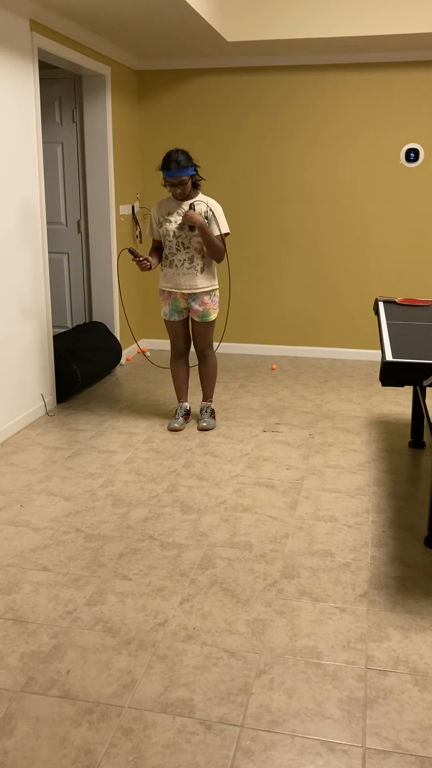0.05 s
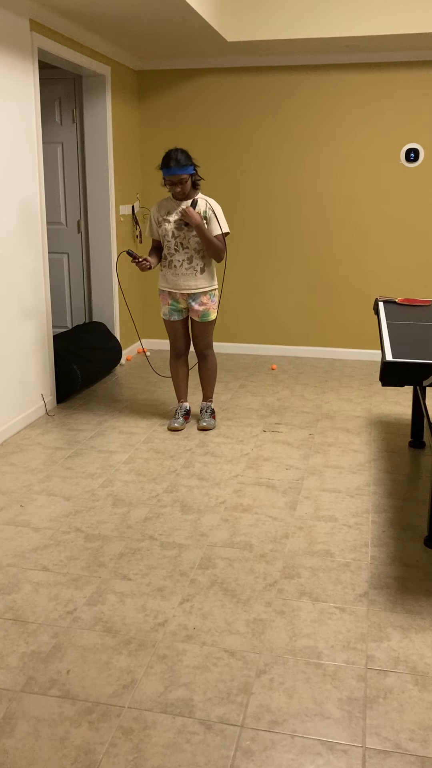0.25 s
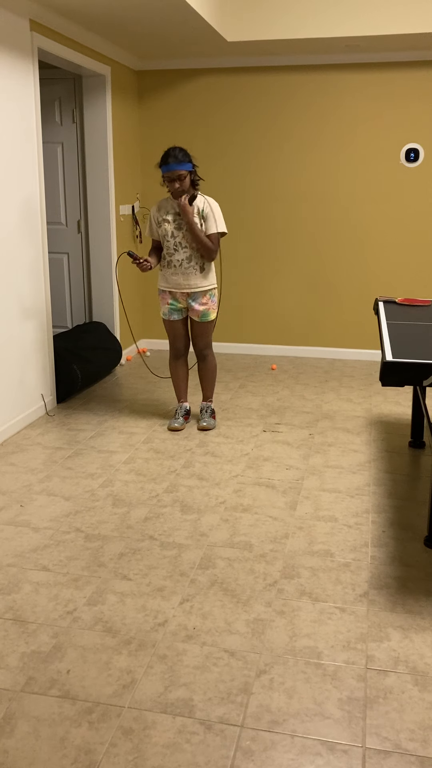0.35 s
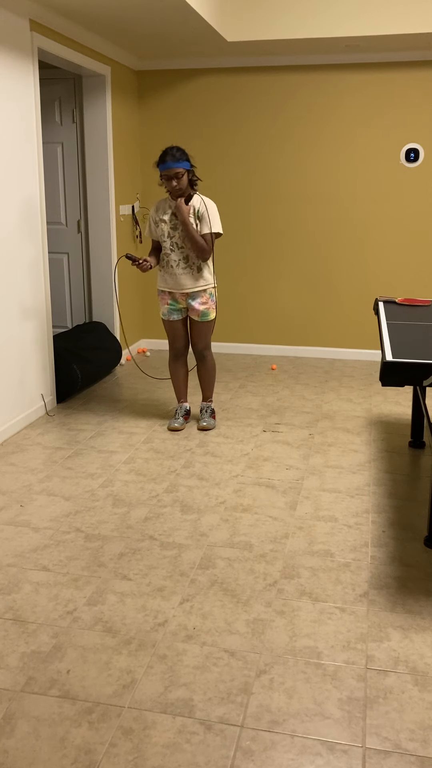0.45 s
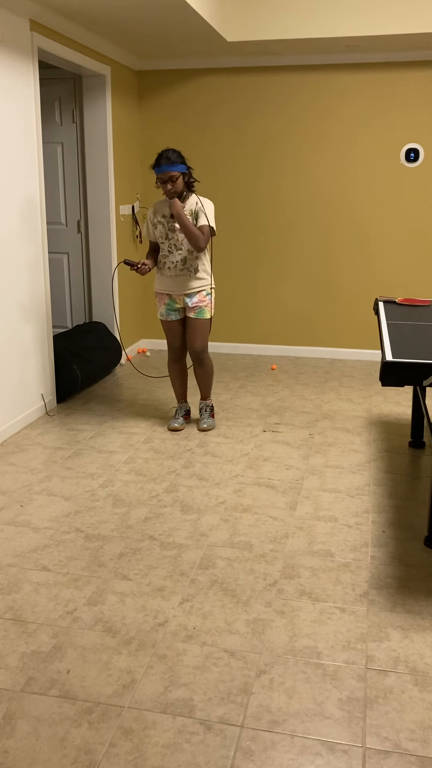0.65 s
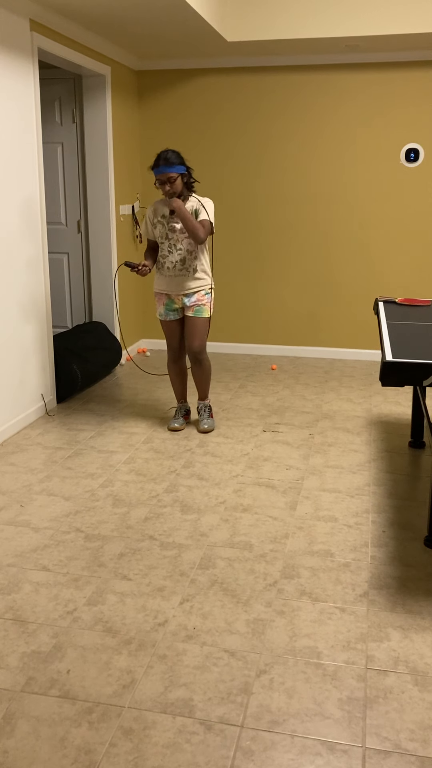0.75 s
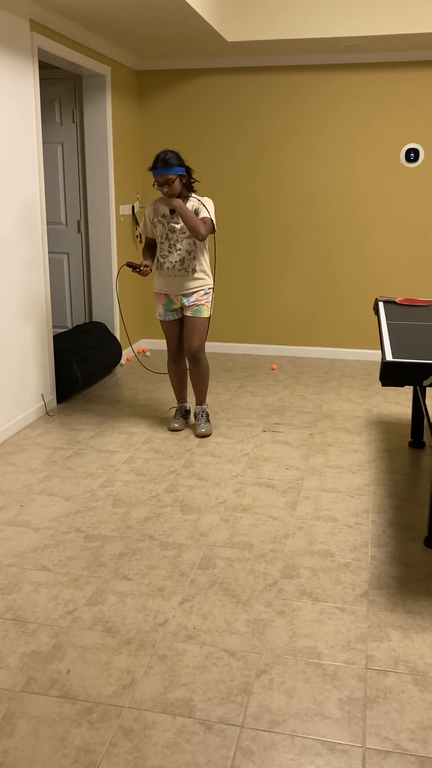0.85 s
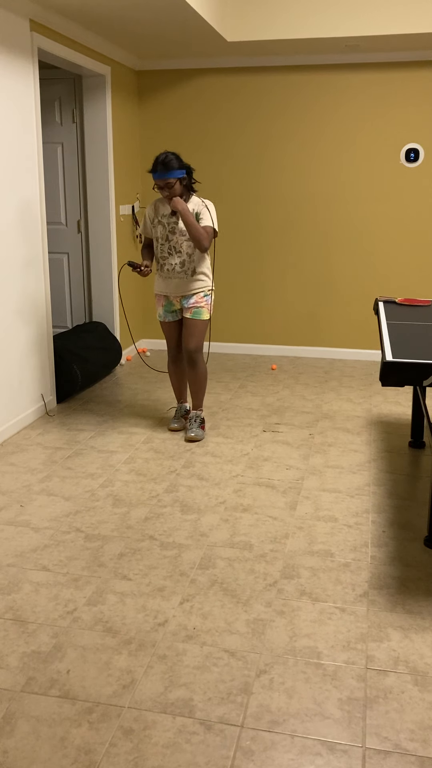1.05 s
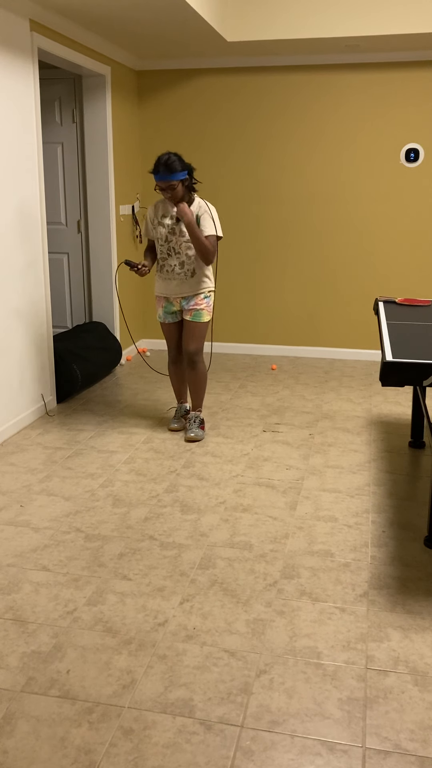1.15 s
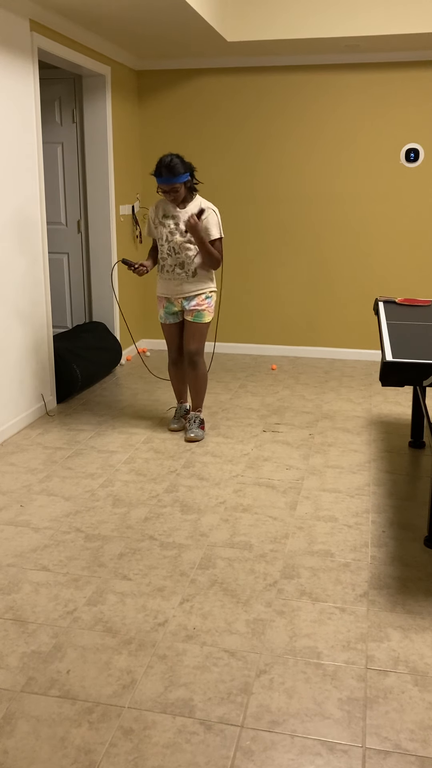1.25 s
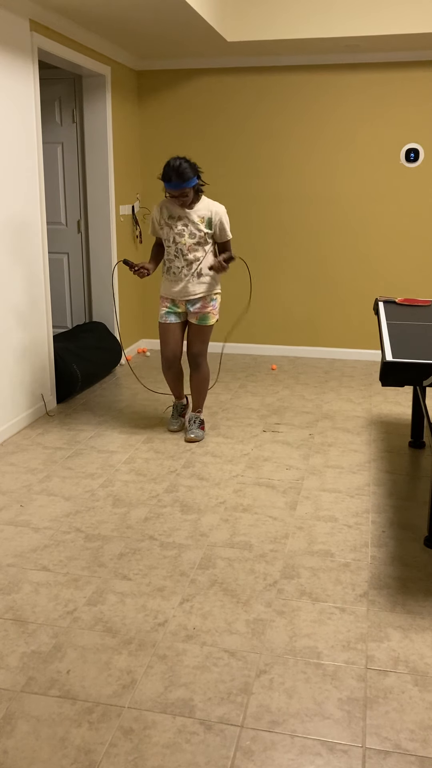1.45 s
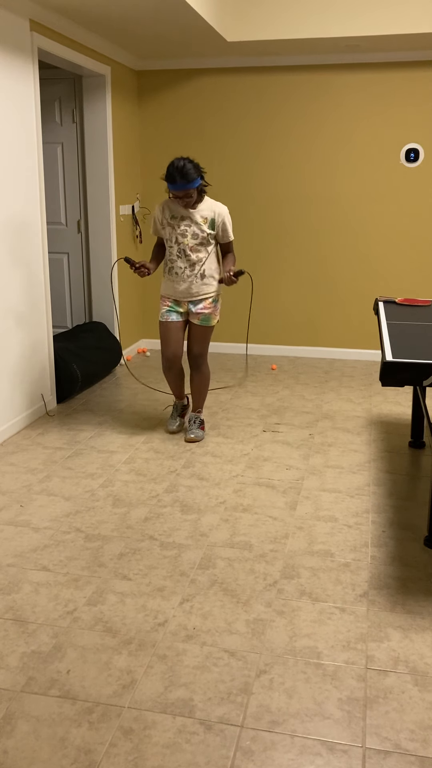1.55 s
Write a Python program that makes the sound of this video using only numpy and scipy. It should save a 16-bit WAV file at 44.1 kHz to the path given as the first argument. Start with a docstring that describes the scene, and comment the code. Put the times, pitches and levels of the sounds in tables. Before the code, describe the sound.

One sharp knock on a tiled floor cracks and rings in an echoing room. Someone then shifts weight with dull thuds, sets a shoe down and scuffs it, clothes rustling faintly. A microphone a few metres away catches quiet room noise.

```python
"""A knock in a bare room

One sharp knock on a tiled floor: a dry crack, hard echoes off the walls and a bright, ringing tail.
Someone shifts weight with dull thuds, sets a shoe down and scuffs it; clothes rustle faintly.
A small microphone a few metres away hears it all over quiet room noise, through two openings
(its ports) that ring in the treble."""
import sys
import numpy as np
from scipy import signal
from scipy.fft import rfft, irfft, next_fast_len
from scipy.io import wavfile

SR = 44100
rng = np.random.default_rng(int(sys.argv[2]) if len(sys.argv) > 2 else 0)


def store_wav(level_fs):
    """Save 16-bit WAV to argv[1]."""
    pcm = np.round(np.clip(np.atleast_2d(level_fs), -1, 1) * 32767)
    wavfile.write(sys.argv[1], SR, pcm.T.astype(np.int16))


N = 70560


def amp(db):
    """Turn decibels into a number to multiply by."""
    return 10 ** (np.asarray(db) / 20)


def along(points, hz):
    """Read a curve of (frequency, value) points at hz, with all octaves equally wide."""
    f, values = np.transpose(points)
    return np.interp(np.log(hz + 1), np.log(f + 1), values)


def since(start):
    """Seconds since start, zero before it."""
    return np.maximum(np.arange(N) / SR - start, 0)


def fade(t, t60):
    """Die away by 60 dB every t60 seconds (the fade time)."""
    return np.exp(-np.log(1000) * t / t60)


def stroke(start, hold, rise, t60):
    """A level that swells at start and begins to fade hold seconds later."""
    return (1 - np.exp(-since(start) / rise)) * fade(since(start + hold), t60)


def ring(start, hz, t60, rise):
    """One pure tone that starts softly and dies away."""
    return stroke(start, rise, rise, t60) * np.sin(2 * np.pi * hz * since(start))


def grain(depth, rate):
    """A level that flickers at random, rate times a second, keeping the average power."""
    gain = np.exp(depth * np.interp(since(0) * rate, np.arange(N), rng.standard_normal(N)))
    return gain / np.sqrt(np.mean(gain ** 2))


def filtered(x, response):
    """Scale and delay each frequency in x as response says."""
    size = 2 * next_fast_len(N)
    return irfft(rfft(x, size) * response(np.fft.rfftfreq(size, 1 / SR)), size)[..., :N]


def coloured(x, colour):
    """Give x a colour: a balance of low and high frequencies."""
    def response(hz):
        gain = amp(along(colour, hz))
        gain /= np.sqrt(np.mean(gain ** 2))
        # these steps keep the filter from sounding before its input does
        cepstrum = irfft(np.log(gain))
        cepstrum[1:len(hz) - 1] *= 2
        cepstrum[len(hz):] = 0
        return np.exp(rfft(cepstrum))
    return filtered(x, response)


def resonant(x, peaks):
    """Make x ring at each (frequency, width, boost) peak; a negative boost cuts a dip."""
    def response(f):
        return 1 + sum((amp(db) - 1) * 1j * f * width / (hz ** 2 - f ** 2 + 1j * f * width)
                       for hz, width, db in peaks)
    return filtered(x, response)


def rippled(x, depth_db=2.6, spacing_hz=22.48):
    """The room favours some frequencies and weakens others, at random."""
    return coloured(x, np.column_stack([spacing_hz * np.arange(N), depth_db * rng.standard_normal(N)]))


# how alike left and right sound: f/Hz, likeness (1 = the same)
LIKENESS = [(100, .99), (170, .98), (280, .85), (520, .45), (1500, .3), (3500, .25), (5400, .86),
            (7500, .9), (8600, .99), (10000, .82), (11600, .98), (13000, .85), (14500, .97)]

def diffuse():
    """Hiss reaching the two ports from all sides."""
    def shares(hz):
        angle = np.arccos(np.clip(along(LIKENESS, hz), -1, 1)) / 2
        return np.array([np.cos(angle), np.sin(angle)])
    shared, opposite = filtered(rng.standard_normal((2, N)), shares)
    return np.array([shared + opposite, shared - opposite])


# colour of the room noise: f/Hz, level/dB
NOISE_COLOUR = [(30, -10), (55, 5.5), (120, 2), (300, -15), (600, -31), (1200, 3), (2500, -8), (5500, -31),
                (9000, -1), (13000, -6), (15500, -26)]

def room_noise():
    """The room's quiet, steady rumble and hiss."""
    return amp(-62) * coloured(diffuse(), NOISE_COLOUR)


def squeak():
    """A faint squeak of the sole, already dying away when the scene opens."""
    return amp(-62) * ring(start=-1.9, hz=1083, t60=5.5, rise=0.025)


# slides of the sole: t/s, length/s, level/dB, fade time/s
SCUFFS = [(-.03, 0.025, -55, 0.92), (1.207, 0.14, -54, 1), (1.431, .07, -63, 0.53)]
# colours of the slides, the heel tap and the footfall: f/Hz, level/dB
SCUFF_COLOUR = [(100, -10), (180, -3.5), (330, 1.5), (700, -2), (1500, 0.5), (2800, -9), (4700, -12.5),
                (6500, -19), (9500, -14.5), (15500, -21)]
HEEL_COLOUR = [(60, 5), (200, 12.5), (600, 14.5), (1300, 13), (2000, -2), (3000, -16), (15000, -12)]
STEP_COLOUR = [(30, -25), (60, -7), (140, -8), (240, -5), (400, -10), (600, -2.5), (900, -15),
               (1700, -15.5), (2700, -28.5), (4700, -21.5), (7000, -29.5), (10000, -28.5), (15500, -46)]
# where the room rings under the shoe: f/Hz, width/Hz, boost/dB
SHOE_PEAKS = [(142, 15, 9.5), (190, 11, 3.5), (291.3, 9.4, 11), (458, 105, 1), (565, 7.3, -6)]

def shoe(lands_s=0.99):
    """A shoe scrapes the tiles, taps its heel and rolls flat; each sound lingers in the room."""
    heel = amp(-46) * stroke(lands_s, hold=0, rise=0.005, t60=0.19) * diffuse()
    roll = amp(-43) * stroke(lands_s, hold=0.058, rise=0.015, t60=0.87)
    step = roll * grain(depth=0.16, rate=330) * diffuse()
    slides = sum(amp(db) * stroke(start, length, rise=0.012, t60=t60)
                 for start, length, db, t60 in SCUFFS)
    grit = slides * grain(depth=0.15, rate=1200) * diffuse()
    sole = coloured(heel, HEEL_COLOUR) + coloured(step, STEP_COLOUR) + coloured(grit, SCUFF_COLOUR)
    return resonant(rippled(sole), SHOE_PEAKS)


# shifts of weight: t/s, level/dB, upper tones compared with the boom/dB
THUDS = [(0.017, -45.5, -7), (0.167, -56, -34), (0.429, -59, -26), (0.705, -53, -4.5), (0.784, -47, -1),
         (1.024, -46.5, 2), (1.488, -48.5, -7.5), (1.525, -43, -12.5)]
# the floor's upper tones: f/Hz, level/dB, fade time/s
FLOOR_TONES = [(97.7, -2, 0.61), (144.1, -2.5, 0.35), (176, -7, 0.2), (268, -22, 0.29)]
# colour of the sole pressing down: f/Hz, level/dB
PAD_COLOUR = [(60, -25), (150, 4.5), (260, 3), (380, -10), (600, -24.5), (1500, -46), (15000, -73)]

def thuds():
    """Each shift of weight makes the floor boom and ring, with a soft puff of noise from the sole."""
    floor, pads = np.zeros((2, N))
    for start, db, upper_db in THUDS:
        boom = ring(start, hz=55.7, t60=0.29, rise=0.013)
        upper = sum(amp(level) * ring(start, hz, t60, rise=0.0049) for hz, level, t60 in FLOOR_TONES)
        floor += amp(db) * (boom + amp(upper_db) * upper)
        pads += amp(db + upper_db - 11) * stroke(start, hold=0, rise=0.0032, t60=0.39)
    return floor + coloured(pads * diffuse(), PAD_COLOUR)


# colours of the grazing touch and of the knock itself: f/Hz, level/dB
TOUCH_COLOUR = [(200, -36), (1500, 1), (3000, -2), (6000, -4), (15000, -20)]
KNOCK_COLOUR = [(150, -34.5), (300, -26), (500, -19), (900, -15), (1600, -11), (2800, -3.5), (4000, -5),
                (6700, 0.5), (7600, -5.5), (10700, -0.5), (12600, -15), (15800, -2.5)]
# broad bands where the knock rings: f/Hz, width/Hz, boost/dB
KNOCK_PEAKS = [(1605, 180, 6), (2804, 220, 3.5), (4685, 186, 7), (5985, 69, 2.5), (6680, 170, 3.5),
               (8700, 310, 9), (10760, 250, 6), (12760, 160, 16.5), (14800, 230, -8)]
# bunches of wall echoes: delay/s, spread/s, level/dB
WALL_ECHOES = [(.006, 0.0027, -27.5), (0.022, 0.0068, -24.5), (0.035, 0.0051, -25.5),
               (0.051, 0.0046, -23.5), (.072, 0.004, -26), (.094, 0.0051, -27), (.137, .005, -35)]

def knock(hit_s=0.2248):
    """A grazing touch leads into the crack, which arrives directly, then off the walls, then blurs."""
    t = since(hit_s)
    direct = amp(-22.5) * np.exp(-t / 0.0055)
    echo_power = sum(amp(db) ** 2 * np.exp(-((t - delay) / spread) ** 2)
                     for delay, spread, db in WALL_ECHOES)
    cracks = (t > 0) * np.sqrt(direct ** 2 + echo_power) * diffuse()
    blow = coloured(cracks + echo_tail(hit_s), KNOCK_COLOUR)
    touch = amp(-37.5) * np.exp(-np.abs(since(0) - hit_s) / 0.004) * diffuse()
    return resonant(blow, KNOCK_PEAKS) + coloured(touch, TOUCH_COLOUR)


# how long the room holds a sound: f/Hz, fade time/s
ROOM_FADE = [(60, 0.32), (150, 0.21), (400, 1.19), (1300, 1.39), (2700, 0.99), (5400, 1.04), (8500, 0.75),
             (11000, 0.84), (15000, 0.39)]
# narrow tones that sing in the tail: f/Hz, boost/dB
TAIL_TONES = [(1690, 6.5), (1915, 10), (2526, 8), (2860, 7), (3095, 8), (4129, 2), (5875, 6), (6684, 10),
              (7010, 5.5), (7106, 0), (7244, 10), (8039, 18), (8609, -2.5), (9092, 3)]

def echo_tail(hit_s, build_s=0.055, tone_width_hz=14.6):
    """Countless echoes merge into a ringing wash; its bass and treble die before its middle."""
    hz, times, bands = signal.stft(diffuse(), SR, nperseg=256)  # split the hiss by frequency
    bands = bands * fade(np.maximum(times - hit_s, 0), along(ROOM_FADE, hz)[:, None])
    wash = signal.istft(bands, nperseg=256)[1][:, :N]
    swell = np.sqrt(1 - np.exp(-since(hit_s) / build_s))
    tail = amp(-20) * wash * swell * grain(depth=0.14, rate=3000)
    return resonant(rippled(tail), [(f, tone_width_hz, db) for f, db in TAIL_TONES])


# movements of the clothes: t/s, length/s, level/dB
RUSTLES = [(0.909, .04, -55.5), (1, 0.083, -56), (1.215, 0.034, -71), (1.416, 0.087, -59)]
# colour of the cloth: f/Hz, level/dB
RUSTLE_COLOUR = [(1000, -15), (4000, 0), (6500, -17), (10000, 12.5), (13000, 2.5), (15500, -30)]

def clothes():
    """Cloth brushes on cloth as the body moves."""
    rub = sum(amp(db) * stroke(start, length, rise=0.0063, t60=0.36) for start, length, db in RUSTLES)
    return coloured(rub * grain(depth=0.18, rate=270) * diffuse(), RUSTLE_COLOUR)


def scene():
    """The knock and the person's movements over the steady room noise."""
    return knock() + thuds() + shoe() + squeak() + clothes() + room_noise()


# how much louder the left port is than the right: f/Hz, level/dB
LEFT_LOUDER = [(60, 3), (250, 1.3), (800, -1.9), (2500, -1.7), (6000, -0.98), (9000, 0.14)]
# how far the left port's wave runs ahead of the right's: f/Hz, phase/rad
LEFT_AHEAD = [(300, 0), (800, -.5), (1700, .4), (2800, 1.3), (4300, 1.6), (5400, 3.14), (7000, 4.7),
              (7900, 6.2), (8900, 6.3), (10700, 8.5), (11300, 9.35), (12200, 9.5), (14200, 12.5)]

def record(dry):
    """The microphone's ports ring, differ in level and timing, and lose the highest treble."""
    def response(hz):
        left = amp(along(LEFT_LOUDER, hz) / 2) * np.exp(0.5j * along(LEFT_AHEAD, hz))
        treble_cut = np.interp(hz, [15150, 15800], [1, 0]) ** 2
        return np.array([left, 1 / left]) * treble_cut
    ringing = resonant(dry, [(8563, 137, 10.5)])  # f/Hz, width/Hz, boost/dB
    return filtered(ringing, response)


dry = scene()
out = record(dry)
store_wav(out)
```